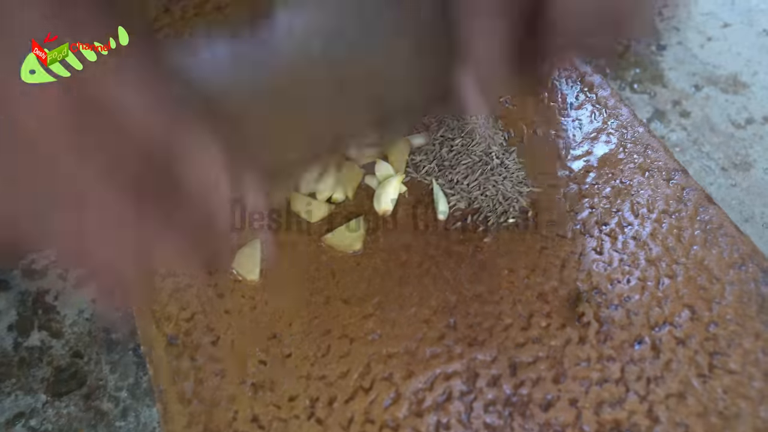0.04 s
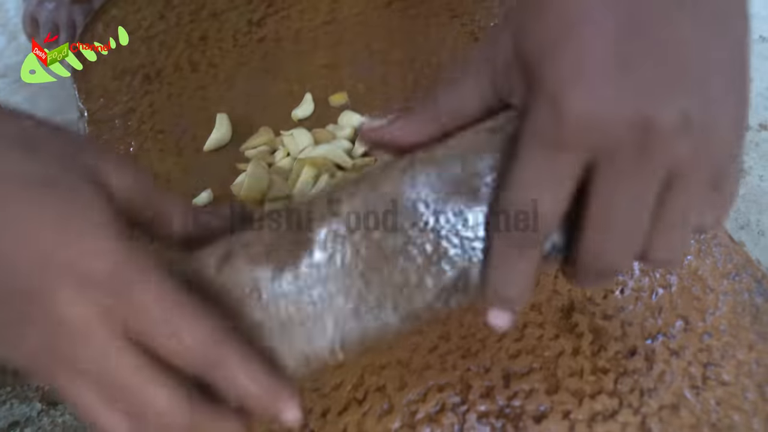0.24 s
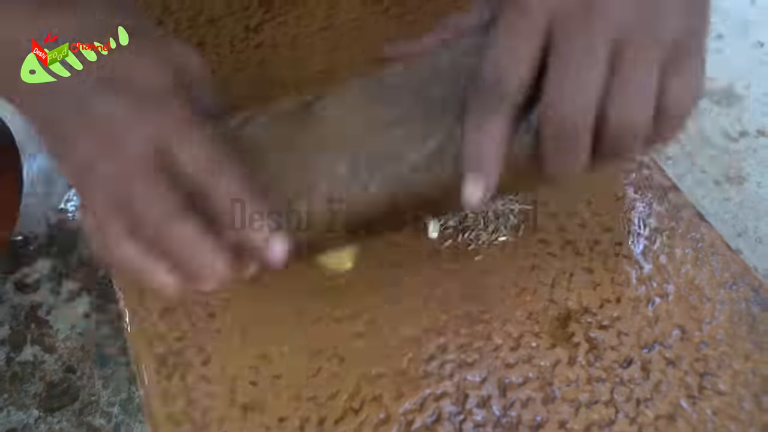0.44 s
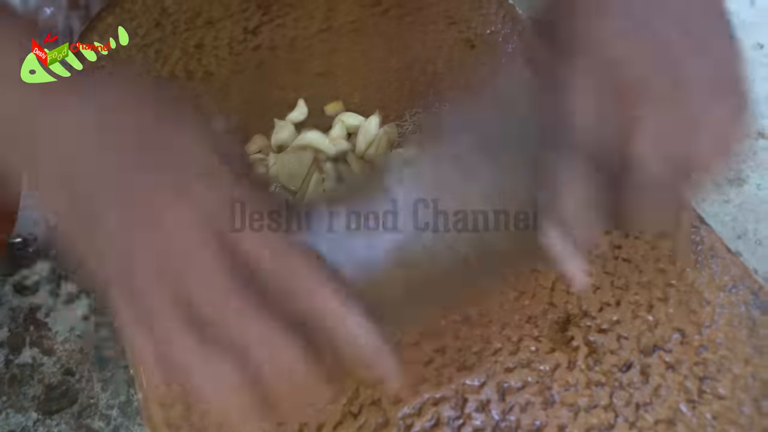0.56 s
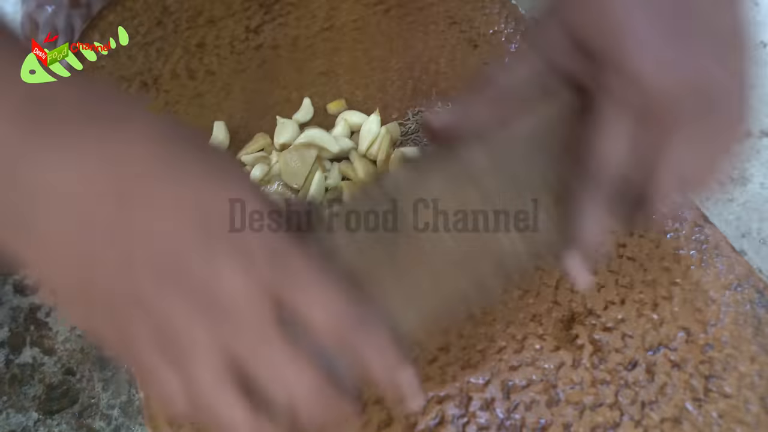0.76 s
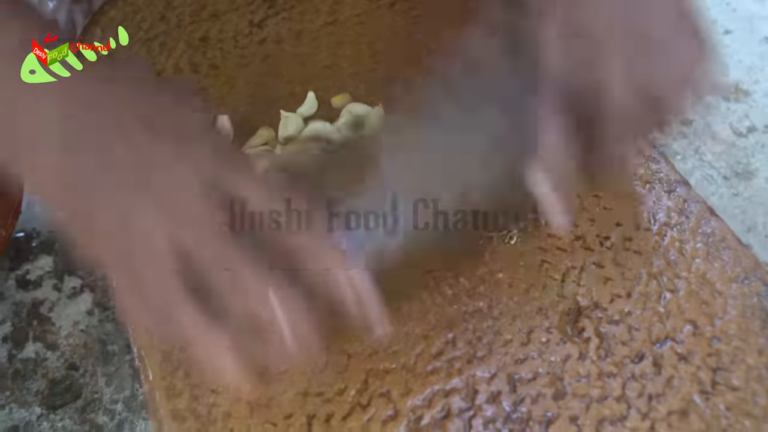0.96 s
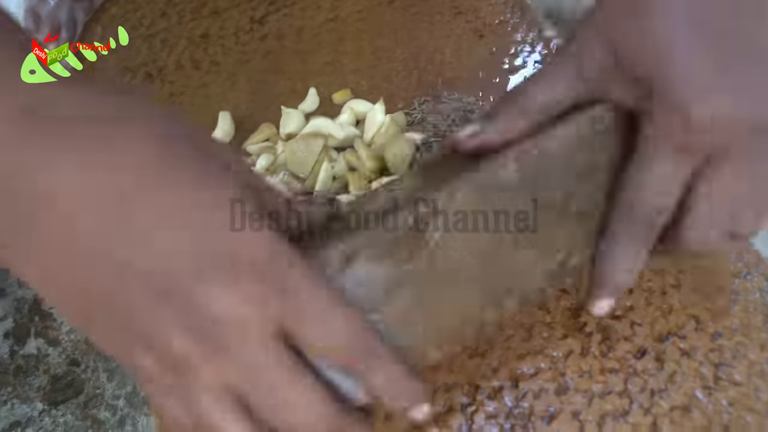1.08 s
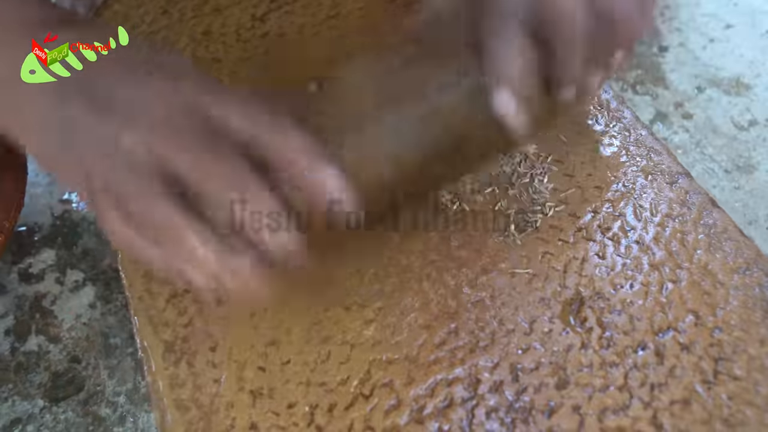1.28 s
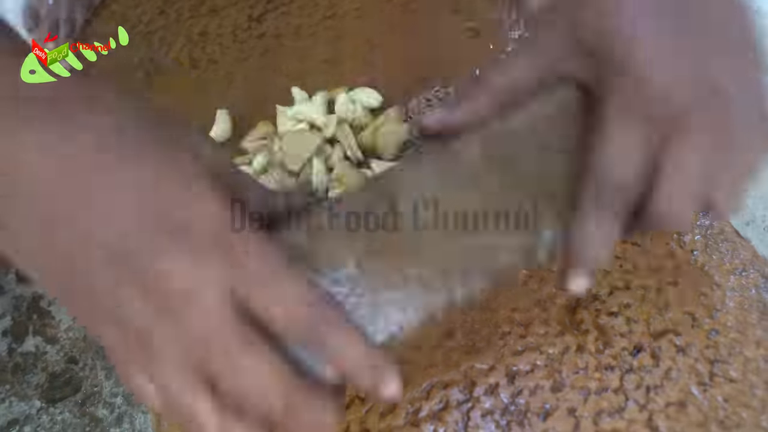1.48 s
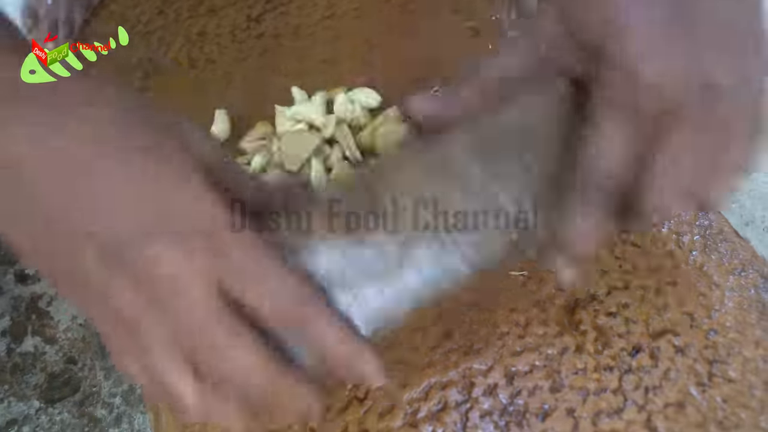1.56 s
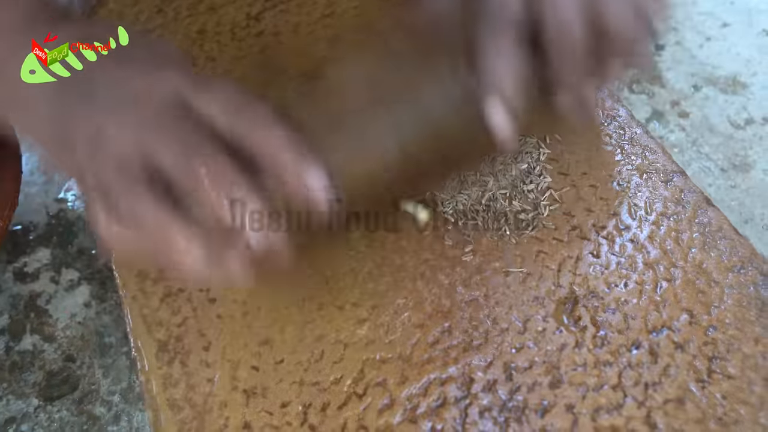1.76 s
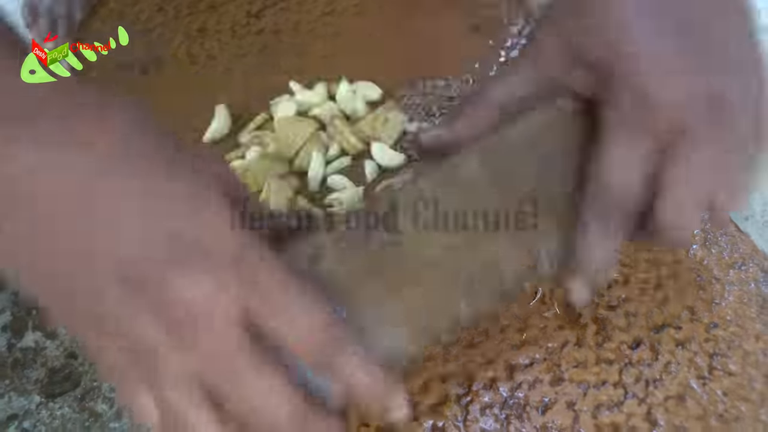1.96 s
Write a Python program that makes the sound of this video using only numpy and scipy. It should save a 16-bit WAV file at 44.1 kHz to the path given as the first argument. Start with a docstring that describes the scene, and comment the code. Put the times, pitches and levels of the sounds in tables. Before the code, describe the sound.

Heavy stone clacks and short gritty rasps as spices are ground by hand on a slab

```python
"""In a kitchen, a stone roller is worked back and forth over a wet stone slab, crushing garlic and cumin.
Over steady background noise come first knocks, filtered clicks that make the stones ring, and rasps, where
tiny contacts do the same. Then come squeaks (gliding tones), seed cracks (short noise bursts) and the hiss
and rumble of wet paste (coloured grains and noise). These return to the end, but for the early squeaks.
Close and room echoes follow the sounds, and a limiter turns the loudest peaks down."""
import sys
import numpy as np
from scipy import signal
from scipy.fft import rfft, irfft
from scipy.io import wavfile
from scipy.ndimage import uniform_filter1d, minimum_filter1d

SR = 44100
rng = np.random.default_rng(int(sys.argv[2]) if len(sys.argv) > 2 else 0)


def unload_audio(sound):
    """Save the sound as a 16-bit wav file, at the path given as the first command line argument."""
    columns = np.transpose(np.atleast_2d(sound))
    # keep every value between -1 and 1, then stretch to whole-number steps
    steps = np.round(np.clip(columns, -1, 1) * 32767)
    wavfile.write(sys.argv[1], SR, steps.astype(np.int16))


N = 89082
T = np.arange(N) / SR  # time of every sample in seconds

# Natural tones of the stones: slab thud, slab body, roller, and the bright tones of grit.
# Each row: pitch in Hz, level in dB, time to die by 60 dB in seconds (before any damping), left over right in dB.
THUD_MODES = [(118.6, -16, 0.062, 0.5), (187.8, -17.5, 0.13, 0.5)]
SLAB_MODES = [(273, -13, 0.046, 0), (344.2, -12.5, 0.08, 0), (436.3, -9.5, 0.043, 0),
              (643.4, -6.5, 0.034, 0), (706.3, -3.5, 0.075, 0), (948, -5, 0.025, 0)]
ROLLER_MODES = [(1072.4, -1, 0.042, -1), (1145.4, -2, 0.057, -7), (1358, -8, 0.045, -1),
                (1481, -9.5, 0.062, 2.5), (1746, -9.5, 0.019, -7)]
GRIT_MODES = [(2786, -13, 0.037, -0.3), (3340, -24.5, 0.031, -1.1), (4144, -12.5, 0.016, 1),
              (6000, -24, 0.019, -0.92)]


def from_db(db):
    """Turn decibels into a factor for the signal."""
    return 10 ** (np.asarray(db) / 20)


def rms_one(x):
    """Scale a signal to an average power of one."""
    return x / np.sqrt(np.mean(x ** 2) + 1e-20)


def pan(db):
    """Left and right gains; a positive level difference is louder on the left."""
    return from_db(np.array([[db], [-db]]) / 2)


def per_bin(points):
    """Read a table of (Hz, value) at every frequency of the spectrum, along a log scale."""
    hz, value = np.transpose(points)
    bin_hz = np.fft.rfftfreq(N, 1 / SR)
    return np.interp(np.log(bin_hz + 1), np.log(hz), value)


def butter(x, hz, kind, order=2):
    """Butterworth filter: keep the low, high or middle band."""
    sos = signal.butter(order, np.clip(hz, 10, .45 * SR), kind, fs=SR, output="sos")
    return signal.sosfilt(sos, x + 1e-18)


def spread(pair, spectrum=((10, 0), (20000, 0))):
    """Colour two unrelated signals and mix them to stereo, less alike in the treble than in the bass."""
    # Each row: frequency in Hz, likeness of left and right from 0 to 1.
    likeness = [(100, 1), (600, 0.89), (1200, 0.59), (3000, 0.3), (8000, 0.32), (15000, 0.13)]
    # Each row: frequency in Hz, left over right in dB.
    treble_pan = [(500, 0), (3000, -1.5), (9000, -3), (15000, -1)]
    mid, side = rfft(pair) * from_db(per_bin(spectrum))
    alike = np.clip(per_bin(likeness), 0, 1)
    sign = np.array([[1], [-1]])  # left, right
    stereo = np.sqrt(1 + alike) * mid + sign * np.sqrt(1 - alike) * side
    tilted = stereo * from_db(sign * per_bin(treble_pan) / 2)
    return rms_one(irfft(tilted, N))


def noise():
    """Two unrelated white noises."""
    return rng.standard_normal((2, N))


def grains(rate, spread_db):
    """Two streams of tiny contacts at random times, of uneven size and random sign."""
    sizes = from_db(spread_db * np.minimum(rng.exponential(1, (2, N)), 5))
    signs = rng.choice([-1, 1], (2, N))
    happens = rng.random((2, N)) < rate / SR
    return sizes * signs * happens


def ring(force, modes, hold=1, tune=1):
    """A force sets damped tones ringing; bending waves are slower in the bass, so low tones come later."""
    bend_lag_s = .002  # lag at 250 Hz
    size = force.shape[-1]
    out = np.zeros((2, size))
    for k, (hz, db, t60, pan_db) in enumerate(modes):
        decay = from_db(-60 / (t60 * hold * SR))  # factor per sample
        turn = 2 * np.pi * hz * tune / SR  # angle per sample
        lag = int(SR * bend_lag_s * max(np.sqrt(1000 / hz) - 1, 0))
        feedback = [1, -2 * decay * np.cos(turn), decay * decay]
        mode = signal.lfilter([0, np.sin(turn)], feedback, force + 1e-18)
        # Neighbouring tones start with opposite signs.
        out[:, lag:] += (-1) ** k * from_db(db) * pan(pan_db) * mode[..., :size - lag]
    return out


def dying(start, t60):
    """A sudden start, then an exponential decay by 60 dB in t60 seconds."""
    return (T >= start) * from_db(-60 * np.clip((T - start) / t60, 0, 3))


def strokes(tables, fade_s=0.0052):
    """Two gain curves from the two level columns, fading out quickly on either side of each stroke."""
    out = np.zeros((2, N))
    for rows in tables:
        s, *columns = np.transpose(rows)
        outside = np.maximum(np.maximum(s[0] - T, T - s[-1]), 0)
        levels = from_db([np.interp(T, s, c) for c in columns])
        out += levels * np.exp(-np.minimum(outside / fade_s, 20))
    return out


def knocks():
    """On bare stone the contact is short and the roller rings; on garlic it is soft, damped, and the slab thuds."""
    # Each row: start in seconds, strength in dB, contact brightness in Hz, roller ring in dB, slab thud in dB,
    # share of the free ring time, pitch ratio.
    knock_rows = [(0.2499, -0.5, 1770, 3.5, 2.5, 1.35, 1.022), (0.303, -8, 1680, -0.5, 8, 0.98, 1.07),
                  (0.36, -19, 1730, 1.5, -1, 0.96, 1.05), (.386, -16, 1530, -2, -21, 0.92, 0.96),
                  (.396, -20.5, 1220, 1, -15, 0.61, 1.105), (0.6204, -6.5, 1950, 3, 5.5, 0.87, 1.006),
                  (0.7, -27.5, 1000, -3, 9.5, 0.53, 1.01), (.811, -19.5, 1410, -7, 7, 1.75, 1.06),
                  (0.8646, 6.5, 1090, -10.5, 1.5, 0.48, 0.98), (0.918, 0, 1030, -11.5, 4.5, 0.35, 1.055),
                  (.933, -17, 580, -13, -5, 0.35, 1.52), (1.022, 0, 1920, -0.5, -7, 1.01, 1.026),
                  (1.0491, 14, 1030, -30, 1, 0.38, 0.95), (1.2379, 7.5, 1150, -11, -1.5, .55, 1.03),
                  (1.274, -2, 1030, -16.5, 5.5, 0.53, 1.047), (1.291, -7, 690, -1, 5, 0.23, 1.09),
                  (1.4481, -9.5, 1880, 3.5, 3.5, 0.87, 1), (1.476, 10.5, 1080, -16.5, 0.5, .45, 1.003),
                  (1.758, 6.5, 1110, -9.5, -2.5, 0.82, 1.02), (1.8996, 8.5, 870, -5, -0.5, 0.36, 0.93),
                  (1.913, 4.5, 1370, -2.5, -3.5, 0.37, 1.055)]
    crack_db, crack_t60_s = -32, 0.015  # short dense noise of the contact itself
    size = SR // 5
    out = np.zeros((2, N + size))
    blow = signal.unit_impulse(size)
    for s, db, contact_hz, ring_db, thud_db, hold, tune in knock_rows:
        force = butter(blow, contact_hz, "low", order=3)
        burst = rng.standard_normal(size) * dying(0, crack_t60_s)[:size]
        crack = butter(butter(burst, contact_hz, "low", order=5), 340, "high")
        thud = from_db(thud_db) * ring(force, THUD_MODES, np.sqrt(hold), tune)
        slab = ring(force, SLAB_MODES, hold, tune)
        roller = from_db(ring_db) * ring(force, [*ROLLER_MODES, *GRIT_MODES], hold, tune)
        knock = thud + slab + roller + from_db(crack_db) * crack
        start = int(s * SR)
        out[:, start:start + size] += from_db(db) * knock
    return out[:, :N]


def stutter():
    """The grip catches and lets go: quick uneven changes of the rasping force."""
    depth_db, fastest_hz = 1, 62
    wander = rms_one(butter(rng.standard_normal(N), fastest_hz, "low"))
    return from_db(depth_db * np.clip(wander, -2, 2))


def rasp():
    """Grains of the two rough faces catch and drive the natural tones of both stones."""
    # One table a stroke. Each row: time in seconds, pressure level in dB, grit level in dB.
    rasp_strokes = [
        [(.306, -41, -28), (.342, -18.5, -30.5), (.362, -27.5, -28.5), (.400, -31.5, -38.5), (.415, -62, -62)],
        [(.744, -38.5, -65), (.79, -31.5, -44.5), (.813, -25, -38.5), (.828, -35, -50), (.858, -37.5, -53)],
        [(1.185, -45, -69), (1.205, -34, -60), (1.216, -22.5, -43.5), (1.235, -27, -42.5)],
        [(1.565, -34.5, -56), (1.59, -35, -36.5), (1.61, -23.5, -46), (1.636, -27.5, -37),
         (1.664, -25.5, -46.5), (1.682, -52, -57)],
        [(1.98, -67, -64), (2.01, -40, -63), (2.03, -38, -46)],
    ]
    body_db, grit_db = 1, 2  # added to the stroke levels
    thud_db, slab_db, dust_db = 0, -4, -13
    pressure, grit = strokes(rasp_strokes)
    force = spread(grains(2600, 3.5)) * stutter()  # contacts per second, size spread in dB
    roller = ring(force, ROLLER_MODES)
    slab = from_db(slab_db) * ring(force, SLAB_MODES)
    thud = from_db(thud_db) * ring(force, THUD_MODES)
    body = rms_one(butter(roller + slab + thud, 1950, "low"))
    ringing_grit = rms_one(butter(ring(force, GRIT_MODES), 1660, "high"))
    dust = rms_one(butter(force, [2000, 8000], "band", order=1))
    bright = ringing_grit + from_db(dust_db) * dust
    return from_db(body_db) * pressure * body + from_db(grit_db) * grit * bright


def smear():
    """Wet paste fizzes in many tiny contacts under the roller, which rumbles over the pitted slab."""
    # One table a stroke. Each row: time in seconds, hiss level in dB, rumble level in dB.
    smear_strokes = [
        [(.51, -48.5, -54), (.544, -33, -58), (.565, -40, -41), (.618, -36, -39.5)],
        [(.955, -53, -57), (.98, -38.5, -55), (1.0, -38, -42.5), (1.024, -36, -52)],
        [(1.21, -59, -55), (1.235, -39.5, -57), (1.29, -40.5, -32.5), (1.33, -61, -51)],
        [(1.35, -52.5, -82), (1.408, -37.5, -45.5), (1.432, -35.5, -48), (1.449, -42, -43)],
        [(1.80, -36, -50), (1.825, -34, -44), (1.862, -32.5, -44.5), (1.895, -57, -37.5)],
    ]
    # Colour of the fizzing paste. Each row: frequency in Hz, level in dB.
    paste_colour = [(350, -38), (600, -16), (708, -17), (858, -13.5), (1490, -6.5), (1780, -16), (2830, -3),
                    (3580, -8), (5950, -8), (13800, -18), (16000, -19.5)]
    # Colour of the rumble. Each row: frequency in Hz, level in dB.
    rumble_colour = [(40, -37), (70, 2), (110, -2), (190, -5.5), (260, -18), (360, -13), (600, -34),
                     (1500, -40)]
    hiss_db, rumble_db = 2, 9  # added to the stroke levels
    hiss, rumble = strokes(smear_strokes)
    fizz = spread(grains(14000, 4.5), paste_colour)  # contacts per second, size spread in dB
    rolling = spread(noise(), rumble_colour)
    return from_db(hiss_db) * hiss * fizz + from_db(rumble_db) * rumble * rolling


def seeds():
    """Each seed cracks in a brief burst of noise around one pitch, with a bright snap."""
    # Each row: start in seconds, level in dB, pitch in Hz, time to die by 60 dB in seconds, left over right in dB.
    seed_rows = [(0.445, -30, 6750, .018, 5.5), (0.977, -19, 4460, 0.0083, -6),
                 (1.225, -46, 7000, 0.019, -2), (1.52, -44, 5500, 0.011, -1),
                 (1.7199, -13.5, 3700, 0.01, -1), (1.816, -5.5, 3270, 0.013, 4)]
    width, snap_db = 0.36, -13  # band reaches this share around the pitch
    out = np.zeros((2, N))
    burst = spread(noise())
    snap = from_db(snap_db) * rms_one(butter(burst, [2500, 11000], "band"))
    for s, db, hz, t60, pan_db in seed_rows:
        tone = rms_one(butter(burst, [hz / (1 + width), hz * (1 + width)], "band"))
        out += from_db(db) * pan(pan_db) * dying(s, t60) * (tone + snap)
    return out


def squeaks():
    """Trapped water gives short, rough squeaks: rising tones whose pitch wavers at random."""
    # Each row: start in seconds, length in seconds, first pitch in Hz, last pitch in Hz, waver in Hz, level in dB.
    squeak_rows = [(.472, .027, 1030, 1480, 50, -38), (.530, .045, 2600, 3200, 330, -37),
                   (.575, .025, 2800, 2950, 200, -43), (.596, .024, 6300, 6600, 400, -42)]
    out = np.zeros(N)
    for s, length, from_hz, to_hz, waver_hz, db in squeak_rows:
        part = np.clip((T - s) / length, 0, 1)  # 0 at the start, 1 at the end
        waver = waver_hz * rms_one(butter(rng.standard_normal(N), 430, "low"))
        hz = from_hz + (to_hz - from_hz) * part + waver
        swell = 2 * np.sqrt(part * (1 - part))
        out += from_db(db) * swell * np.sin(2 * np.pi * np.cumsum(hz) / SR)
    return out


def echoes(x, db, t60):
    """Many blurred reflections: the sound is smeared out by a dying tail of noise."""
    tail = spread(noise()) * dying(.002, t60)  # first echo after 2 ms
    unit_tail = rms_one(tail) / np.sqrt(N)
    return from_db(db) * signal.fftconvolve(x, unit_tail, axes=1)[:, :N]


def background():
    """The steady background is noise with a fixed colour."""
    # Each row: frequency in Hz, level in dB.
    air_colour = [(18, -57), (30, -13), (90, 5), (103, -2), (404, -13.5), (913, -12.5), (1720, -13),
                  (2350, -10.5), (2750, -9), (3060, -12.5), (5900, -18.5), (14000, -26), (16000, -25.5)]
    return from_db(-44.5) * spread(noise(), air_colour)


def scene():
    """The stones, reflections from the floor and walls, and the steady background."""
    hits = knocks()
    stones = hits + rasp() + smear() + seeds() + squeaks()
    near = echoes(hits, -5, 0.045)  # level in dB, time to die by 60 dB in seconds
    room = echoes(stones, -21.5, 0.26)
    return stones + near + room + background()


def record(dry):
    """Cut the bass, turn loud peaks down with a fast limiter that recovers more slowly, and cut the top."""
    ceiling, release_db_per_s, attack_s = 0.47, 99.5, 0.00045
    x = butter(dry, 93, "high", order=3)
    over_db = 20 * np.log10(np.maximum(np.abs(x).max(axis=0) / ceiling, 1))
    # After each peak the reduction shrinks at the release rate.
    release_db = release_db_per_s * T
    held_db = np.maximum.accumulate(over_db + release_db) - release_db
    width = max(int(attack_s * SR), 2)
    gain_db = uniform_filter1d(minimum_filter1d(-held_db, width), width)
    x = x * from_db(gain_db)
    top_cut = signal.cheby2(14, 50, 16600, fs=SR, output="sos")  # Hz where the full cut is reached
    return signal.sosfiltfilt(top_cut, x)


dry = scene()
out = record(dry)
unload_audio(out)
```